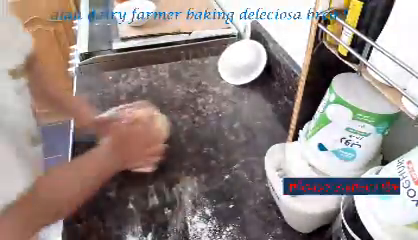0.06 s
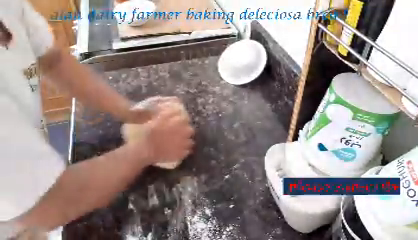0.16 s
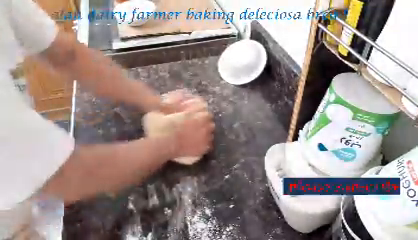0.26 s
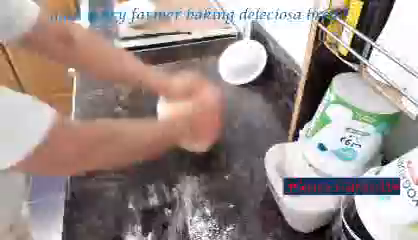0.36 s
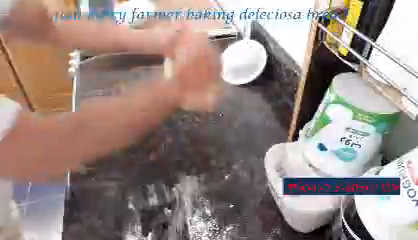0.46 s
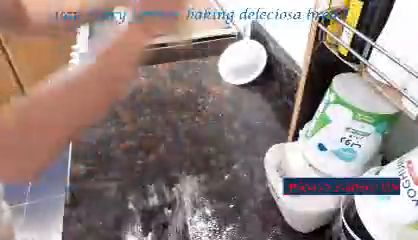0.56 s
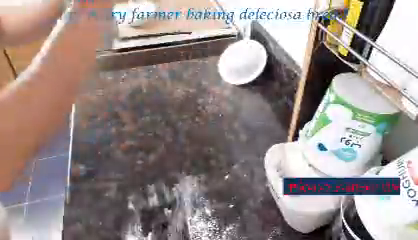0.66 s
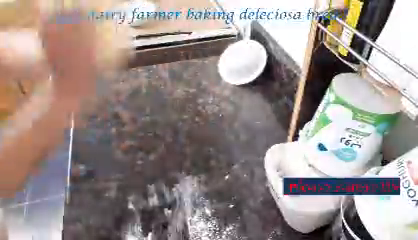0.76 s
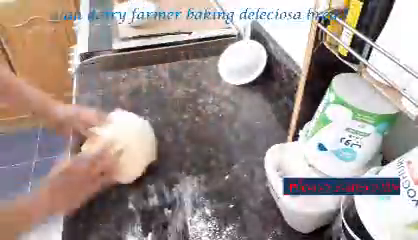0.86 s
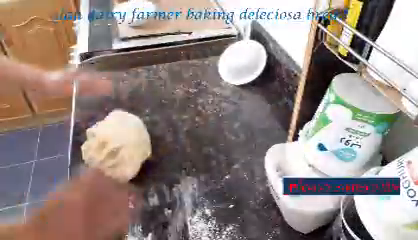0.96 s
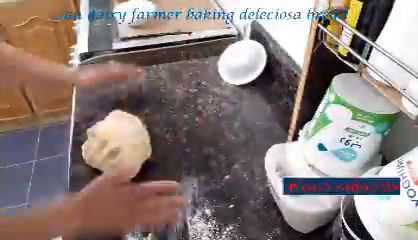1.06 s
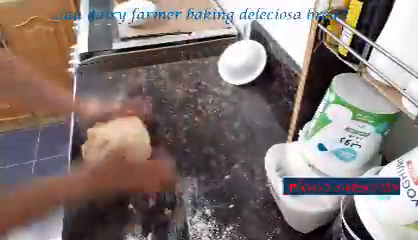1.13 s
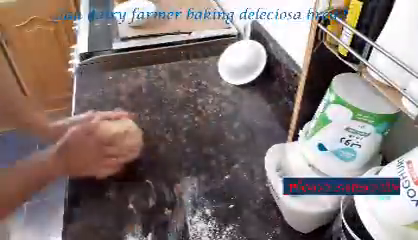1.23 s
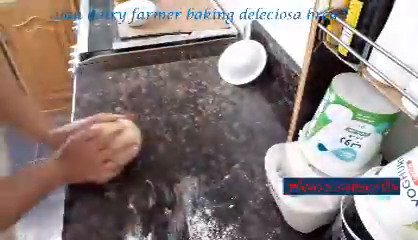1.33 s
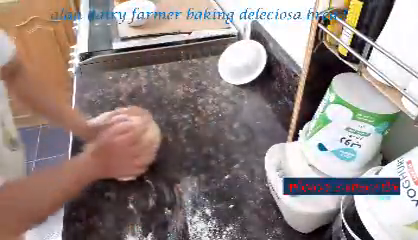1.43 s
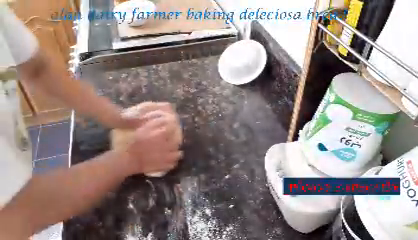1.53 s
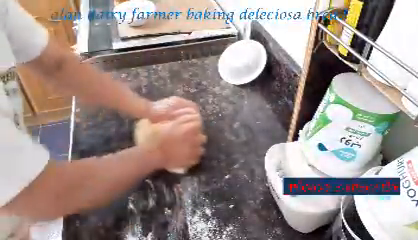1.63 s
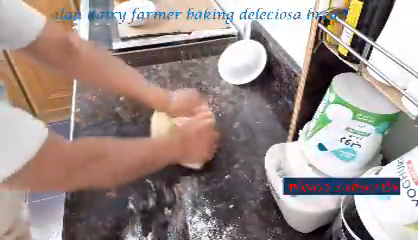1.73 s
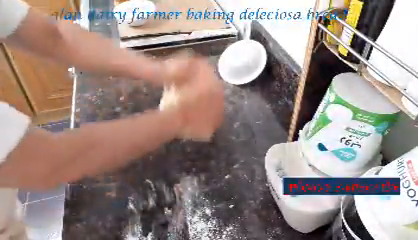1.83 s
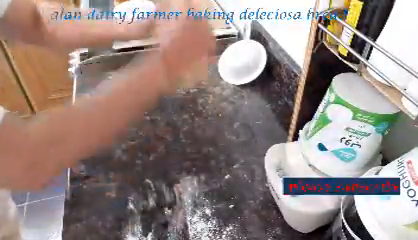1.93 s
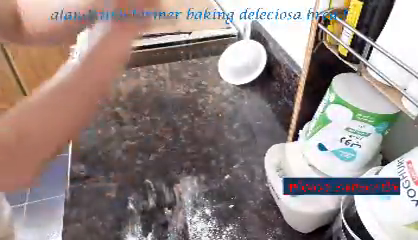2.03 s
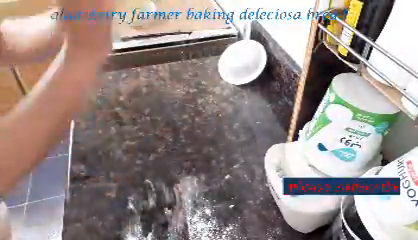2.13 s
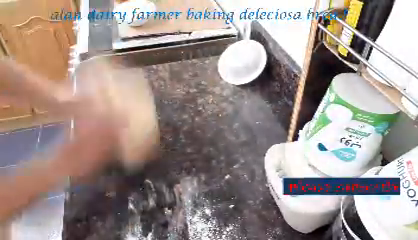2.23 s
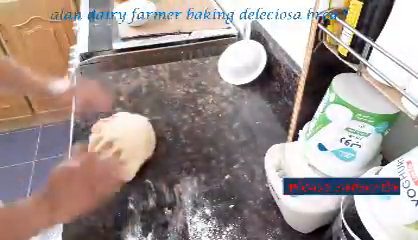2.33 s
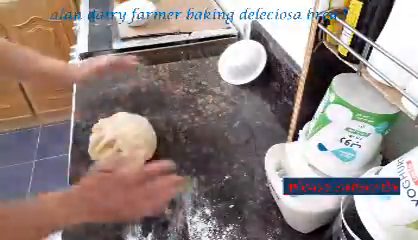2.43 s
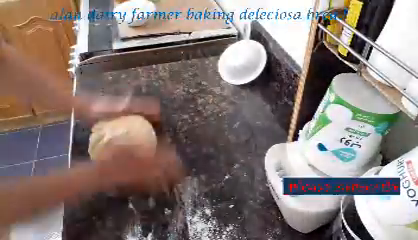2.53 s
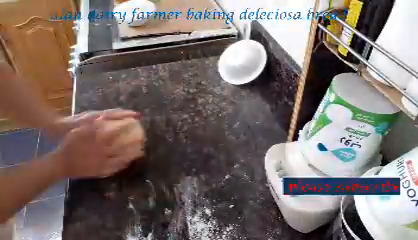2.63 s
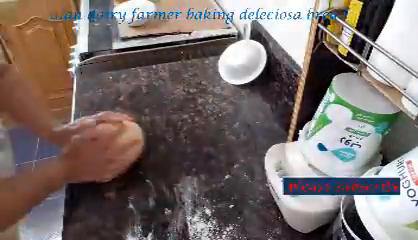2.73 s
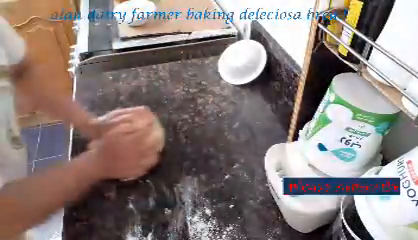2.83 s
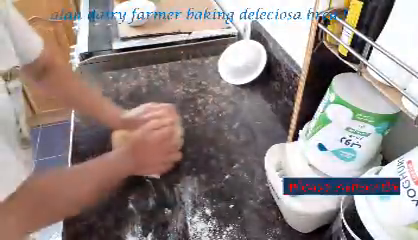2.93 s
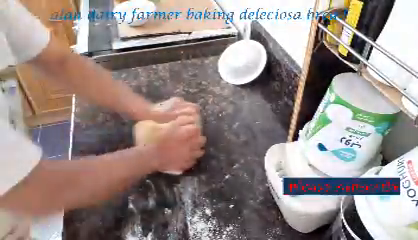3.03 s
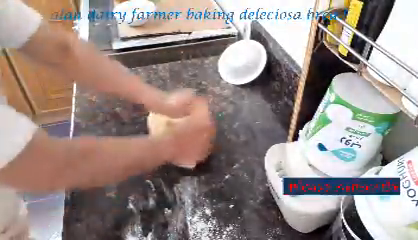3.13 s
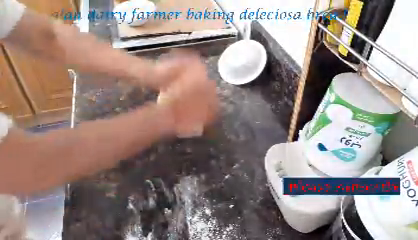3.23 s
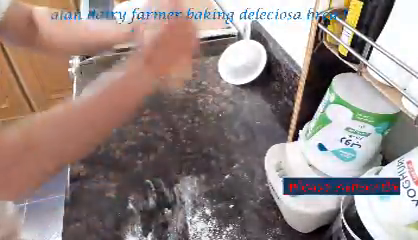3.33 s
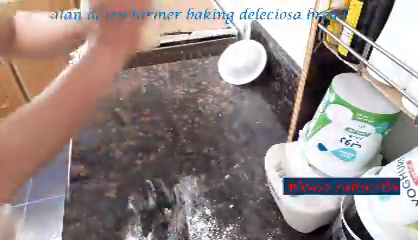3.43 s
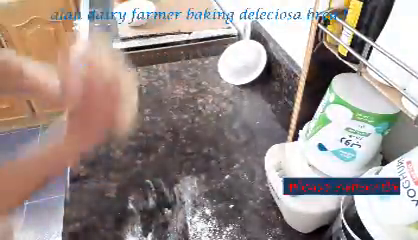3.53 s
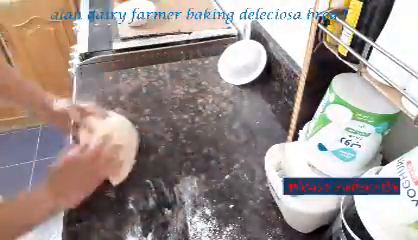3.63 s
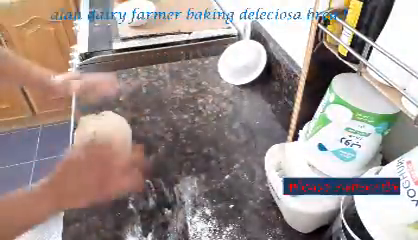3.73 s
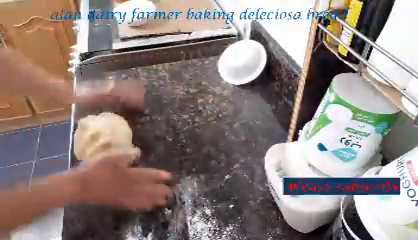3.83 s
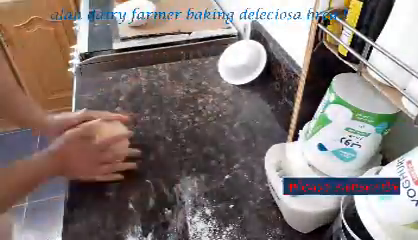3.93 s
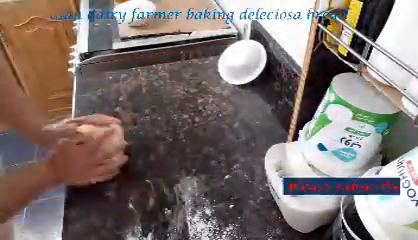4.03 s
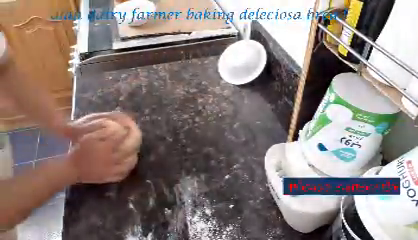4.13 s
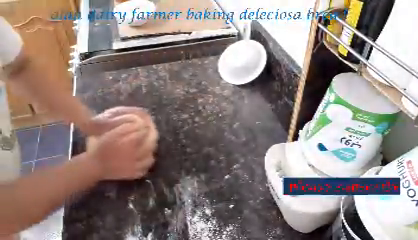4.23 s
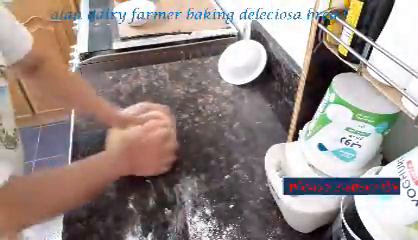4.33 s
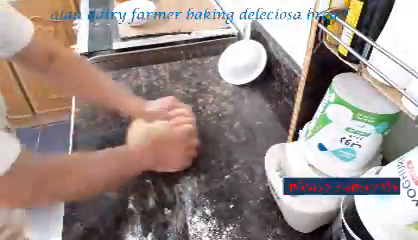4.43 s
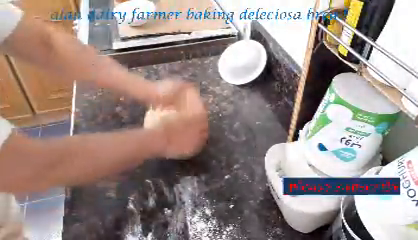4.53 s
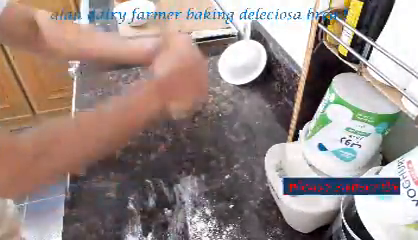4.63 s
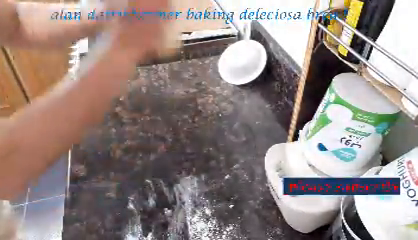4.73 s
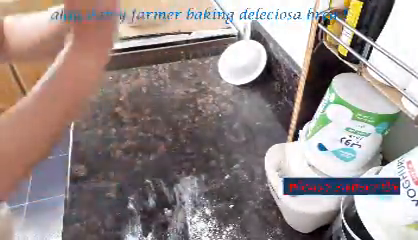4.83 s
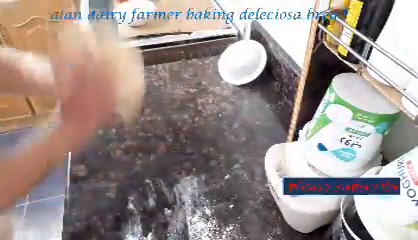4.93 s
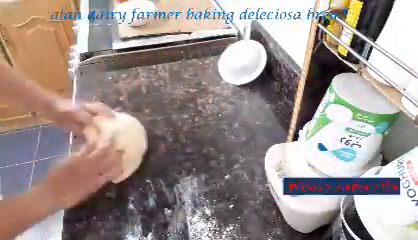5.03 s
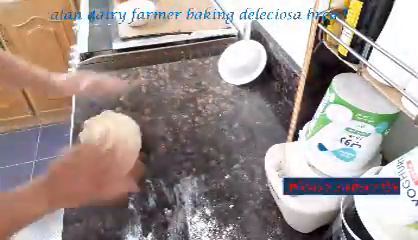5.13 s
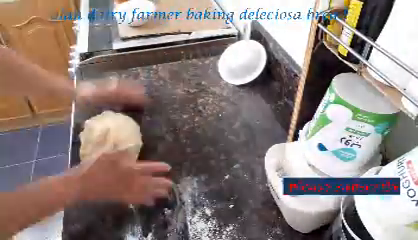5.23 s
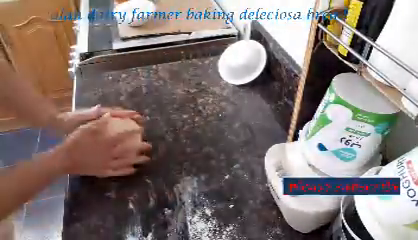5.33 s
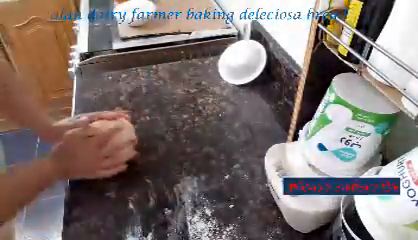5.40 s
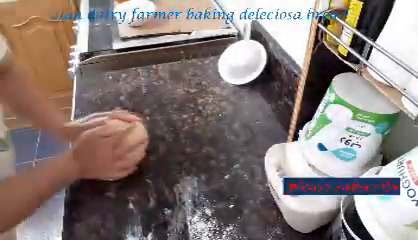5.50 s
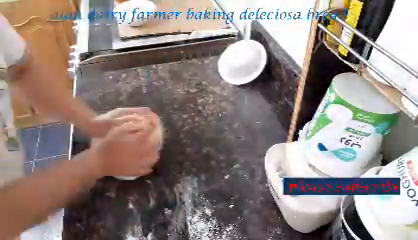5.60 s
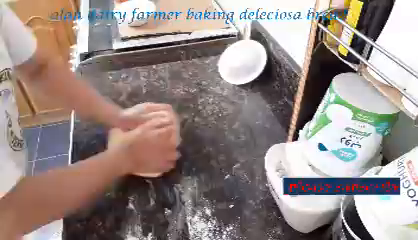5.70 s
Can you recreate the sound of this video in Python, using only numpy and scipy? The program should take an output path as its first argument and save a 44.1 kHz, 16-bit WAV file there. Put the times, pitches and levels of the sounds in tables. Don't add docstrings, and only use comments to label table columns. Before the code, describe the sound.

A small, hard-walled kitchen heard through a close stereo microphone, with a very quiet fridge drone, mains hum and soft hiss. At first hands rub dough over floury stone with faint dry scrapes, low counter rumble and tiny squeaks; around 0.3 s the dough peels away stickily. At 0.86 s it lands with a loud, wet, flat smack and a deep wooden cabinet boom, dying in short bright tile reflections. A much quieter bounce and roll follow at about 1.1 s, then scraping and another soft peel near 1.75 s. The second slap comes at 2.26 s, with a bounce near 2.5 s and small squeaks and chirps around 2.8 to 3 s. The third, at 3.62 s, has the sharpest crack, with a soft double bounce near 3.9 s. More dragging leads to a softer, duller fourth slap at 5.03 s, a faint bounce at 5.3 s, and final light scraping.

```python
import sys
import numpy as np
from scipy import signal
from scipy.fft import rfft, irfft
from scipy.io import wavfile

SR = 44100
rng = np.random.default_rng(int(sys.argv[2]) if len(sys.argv) > 2 else 0)


def to_wav(s):
    ch = np.atleast_2d(s).T
    pcm = np.round(np.clip(ch, -1, 1) * 32767)
    wavfile.write(sys.argv[1], SR, pcm.astype(np.int16))


def amplitude_ratio(level_db):
    exponent = np.asarray(level_db, float) / 20
    return 10 ** exponent


N = 254016
BLOW_PAN_DB, HAND_PAN_DB = -4, -5.5

# start_s, level_db
GRAZES = [
    (0.8541, -31),
    (2.256, -33.5),
    (3.6115, -45.5),
    (5.0247, -46.5),
]
# start_s, boom_db, door_db, shelf_db, room_db
THROWS = [
    (.8630, -19.5, -7, 0.5, -3.5),
    (2.2640, -21, 2.5, -23.5, -2.5),
    (3.6233, -19, -7, -3, -1.5),
    (5.0343, -21.5, -13.5, -7.5, -1.5),
    (1.095, -45.5, -7, -15.5, -2),
    (2.516, -42.5, -5, -8, 2.5),
    (3.877, -46.5, -6, -9, -2),
    (5.275, -50.5, -0.5, -8, 0),
]


def at_hz(points, hz):
    table_hz, value = np.array(points).T[:2]
    return np.interp(np.log(hz), np.log(table_hz), value)


def rms_one(x):
    return x / np.sqrt(np.mean(x ** 2) + 1e-20)


def stereo_noise(gain, size=N):
    # pitch_hz, likeness (0 to 1)
    coherence = [(60, 0.971), (200, 0.893), (500, 0.46), (1500, 0.03), (12000, 0.039)]
    hz = np.maximum(np.arange(size // 2 + 1) * SR / size, 10)
    alike = np.clip(at_hz(coherence, hz), 0, 1)
    mid, side = rfft(rng.standard_normal((2, size))) * gain(hz)
    return irfft(np.sqrt(1 + alike) * mid + np.sqrt(1 - alike) * side * [[1], [-1]], size)


def coloured_noise(spectrum):
    return rms_one(stereo_noise(lambda hz: amplitude_ratio(at_hz(spectrum, hz))))


def resonance(x, hz, width_hz):
    r = np.exp(-np.pi * width_hz / SR)
    feedback = [1, -2 * r * np.cos(2 * np.pi * hz / SR), r * r]
    return signal.lfilter([(1 - r * r) / 2, 0, (r * r - 1) / 2], feedback, x)


def double_resonance(x, hz, width_hz):
    return resonance(resonance(x, hz, width_hz), hz, width_hz)


def band(x, low_hz, high_hz):
    edges_hz = [low_hz, min(high_hz, .45 * SR)]
    return signal.sosfilt(signal.butter(2, edges_hz, "band", fs=SR, output="sos"), x)


def swells(rows, rise_s, fall_s, rest_db):
    t = np.arange(N) / SR
    s, length_s, db = np.array(rows).T[:, :, None]
    rising = (t - s) / rise_s + 1
    falling = (s + length_s - t) / fall_s + 1
    ramp = np.clip(np.minimum(rising, falling), 0, 1)
    return amplitude_ratio(rest_db) + np.max(amplitude_ratio(db) * np.sin(np.pi / 2 * ramp) ** 2, axis=0)


def fridge():
    # time_s, level_db
    loudness = [(0, -75), (.24, -79), (.6, -73.5), (.8, -77), (1.3, -74), (1.6, -80), (1.95, -72.5),
                (2.2, -74), (2.8, -76), (2.92, -73), (3.4, -73.5), (4.1, -71.5), (4.4, -71), (4.65, -70.5),
                (4.9, -70.5), (5.4, -72.5), (5.76, -70.5)]
    # pitch_hz, level_db (per Hz)
    drone = [(120, -38), (200, -13), (232, -4.5), (291, -0.5), (318, -5), (413, 0), (523, -7), (620, -7.5),
             (730, -19.5), (1040, -18.5), (1400, -27.5), (1820, -58), (3080, -120)]
    swell = amplitude_ratio(np.interp(np.arange(N) / SR, *np.transpose(loudness)))
    return amplitude_ratio(4.5) * swell * coloured_noise(drone) * amplitude_ratio([[-1.5], [1.5]])


def microphone_noise():
    # pitch_hz, level_db (per Hz)
    hiss = [(700, -4.5), (1000, -8), (1350, -12), (1800, -6.5), (2300, -17), (3300, -15), (4000, -21),
            (4600, -20), (7000, -21), (8000, -9.5), (9100, -8.5), (9800, -23), (11500, -15), (13500, -20.5)]
    return amplitude_ratio(-75 + 1.5) * coloured_noise(hiss) * amplitude_ratio([[-1.5], [1.5]])


def electric_tones():
    # pitch_hz, level_db
    tones = [(100, -84), (11000, -90)]
    t = np.arange(N) / SR
    return sum(amplitude_ratio(db) * np.sqrt(2) * np.sin(2 * np.pi * hz * t) for hz, db in tones)


def rumble():
    # start_s, level_db
    bumps = [(0.0, -62), (.22, -67.5), (.41, -80.5), (.74, -77.5), (1.2, -64.5), (1.43, -70), (1.76, -73.5),
             (2.05, -77), (2.48, -56), (2.7, -72), (3.15, -65.5), (3.33, -72.5), (3.95, -62), (4.3, -73),
             (4.52, -65), (4.8, -68.5), (5.38, -62), (5.6, -67)]
    # pitch_hz, level_db (per Hz)
    low_spectrum = [(15, -57), (25, -14.5), (40, -17.5), (86, 1.5), (119, -6.5), (146, 0), (160, -9),
                    (173, -15.5), (200, -13), (260, -42.5), (440, -120)]
    rise_s, t60_s, rest_db = 0.034, 0.74, -79
    s, db = np.array(bumps).T[:, :, None]
    since = np.maximum(np.arange(N) / SR - s + rise_s, 0)
    shaken = amplitude_ratio(db - 60 * since / t60_s) * np.minimum(since / rise_s, 1)
    gain = amplitude_ratio(rest_db) + np.max(shaken, axis=0)
    return amplitude_ratio(2.5) * gain * coloured_noise(low_spectrum)


def dragging():
    # start_s, length_s, level_db
    strokes = [(0.05, 0.031, -68.5), (.15, .1, -75), (.31, 0.0685, -67.5), (.62, 0.0405, -74.5),
               (1.1, 0.104, -69.5), (1.4, 0.028, -71.5), (1.5, 0.19, -71.5), (1.75, 0.027, -67),
               (1.98, 0.042, -80.5), (2.5, 0.134, -71.5), (2.8, .29, -66.5), (3.12, 0.036, -65),
               (3.88, 0.082, -64.5), (4.11, 0.0735, -69), (4.22, .1, -71.5), (4.4, 0.177, -65),
               (4.77, .03, -77), (5.28, 0.103, -66.5), (5.65, .11, -67.5)]
    # pitch_hz, level_db (per Hz)
    friction = [(700, -8), (1800, -12.5), (2200, -10), (3900, -12.5), (4600, -8.5), (7400, -3), (8100, -1),
                (9100, -1), (9800, -11.5), (11600, -2.5), (13500, -4)]
    grip = swells(strokes, rise_s=0.093, fall_s=0.1162, rest_db=-85)
    return grip * coloured_noise(friction) * amplitude_ratio([[-.5], [3.5]])


def duct_air():
    # start_s, length_s, level_db
    gusts = [(.05, 0.043, -78.5), (.33, 0.039, -80), (.5, 0.19, -76.5), (1.2, 0.232, -81),
             (1.77, 0.051, -81.5), (2.0, 0.063, -79.5), (2.6, 0.053, -78.5), (2.81, 0.082, -73.5),
             (2.95, 0.081, -78), (3.15, .03, -82), (3.95, 0.0488, -69.5), (4.12, 0.046, -81.5),
             (4.47, 0.11, -78), (4.74, 0.048, -74), (4.88, .05, -80.5), (5.35, 0.031, -75)]
    # pitch_hz, width_hz, level_db
    duct_modes = [(1521, 150, -2), (1788.7, 210, 0.5)]
    flow = swells(gusts, rise_s=0.077, fall_s=0.1016, rest_db=-91.5)
    white = stereo_noise(np.ones_like)
    air = sum(amplitude_ratio(db) * rms_one(double_resonance(white, hz, width)) for hz, width, db in duct_modes)
    return flow * rms_one(air) * amplitude_ratio([[-.5], [3.5]])


def squeaks():
    # start_s, length_s, pitch_hz, width_hz, level_db
    slips = [
        (0.039, 0.11, 4440, 250, -76.5),
        (0.295, 0.52, 3302, 250, -85),
        (0.439, 0.366, 4610, 250, -84),
        (2.784, 0.176, 4360, 200, -77.5),
        (2.791, 0.048, 11520, 700, -70),
        (2.95, 0.068, 11780, 495.5, -69),
    ]
    out, size = np.zeros((2, N)), SR // 2
    t = np.arange(size) / SR
    for s, length_s, hz, width_hz, db in slips:
        squeal = double_resonance(rng.standard_normal((2, size)), hz, width_hz)
        swell = np.sin(np.pi * np.clip(t / length_s, 0, 1)) ** .5
        i = round(s * SR)
        out[:, i:i + size] += amplitude_ratio(db) * swell * rms_one(squeal)
    return out * amplitude_ratio([[-2], [2]])


def colours(x, pocket_hz, thwack_db, pocket_db, spray_db, crack_db):
    thwack = 5.015 * band(x, 260, 1600)
    pocket = 6.99 * resonance(x, pocket_hz, 950)
    spray = 4.6 * band(x, 2100, 8500)
    crack = 3.8 * resonance(x, 8600, 1800) + 1.8 * band(x, 9800, 15000)
    return amplitude_ratio([thwack_db, pocket_db, spray_db, crack_db]) @ np.stack([thwack, pocket, spray, crack], axis=1)


def contacts(rows, rise_s, t60, snap, lag_s, pan_db, size):
    # start_s, pitch_hz
    pockets = [
        (0, 1660),
        (2.2, 1940),
        (2.5, 1842),
        (3.5, 1650),
        (3.85, 1930),
        (5.0, 1391),
    ]
    out, t = np.zeros((3, N)), np.arange(size) / SR
    shape = (1 - np.exp(-t / rise_s)) * amplitude_ratio(-60 * t / t60)
    for s, *levels_db in rows:
        common = rng.standard_normal(size)
        rush = shape * (common + 0.79 * rng.standard_normal((3, size)))
        rush[:, 4:7] -= snap * np.hanning(5)[1:4]
        rush[0] = np.roll(rush[0], 3)
        rush[2] = (t == 0) * np.sqrt(np.sum(shape ** 2) + snap ** 2)
        pocket_hz = [hz for start, hz in pockets if start <= s][-1]
        i = round((s + lag_s) * SR)
        pan = amplitude_ratio([[pan_db / 2], [-pan_db / 2], [0]])
        out[:, i:i + size] += colours(rush, pocket_hz, *levels_db) * pan
    return out


def tinted(rows, colour_db):
    return [(s, *(db + np.array(colour_db))) for s, db in rows]


def lifts():
    # start_s, level_db
    peels = [
        (.33, -72),
        (1.745, -70.5),
        (3.125, -73),
        (4.52, -69.5),
    ]
    # thwack_db, pocket_db, spray_db, crack_db
    tint_db = (-1, -2, 1, -2.5)
    return contacts(tinted(peels, tint_db), rise_s=0.0093, t60=0.16, snap=0, lag_s=0,
                    pan_db=HAND_PAN_DB, size=8192)


def swish():
    # thwack_db, pocket_db, spray_db, crack_db
    tint_db = (-18.5, -16.5, -14.5, 3)
    lead_s, level_db = .066, -61
    falls = [(s - lead_s, level_db) for s, db in GRAZES]
    return contacts(tinted(falls, tint_db), rise_s=0.11, t60=0.71, snap=0, lag_s=0,
                    pan_db=HAND_PAN_DB, size=3000)[:2]


def grazes():
    # thwack_db, pocket_db, spray_db, crack_db
    tint_db = (2, -1.5, -1.5, -1)
    return contacts(tinted(GRAZES, tint_db), rise_s=.003, t60=0.1, snap=0, lag_s=0,
                    pan_db=BLOW_PAN_DB, size=4096)


def blows():
    # start_s, thwack_db, pocket_db, spray_db, crack_db
    impacts = [(0.858, -21.5, -28.5, -32.5, -35), (0.861, -13.5, -23, -28.5, -26.5),
               (0.865, -22.5, -13.5, -29.5, -34.5), (0.873, -23, -25, -33.5, -29),
               (2.261, -13, -23, -32, -32), (2.266, -16.5, -18, -28.5, -35),
               (2.268, -18.5, -28.5, -36, -28), (2.275, -33, -18, -37, -34.5),
               (3.615, -12, -21, -23, -12.5), (3.622, -19, -29, -21, -27.5),
               (5.027, -27, -22.5, -32.5, -22), (5.031, -30, -34, -25, -30.5)]
    return contacts(impacts, rise_s=0.0004, t60=0.01363, snap=1.5, lag_s=.001,
                    pan_db=BLOW_PAN_DB, size=2048)


def cabinet(push_s):
    # pitch_hz, level_db, t60_s
    carcass = [(96.32, -10.5, 0.59), (112, -12, 0.39), (113.62, -2.5, 0.4), (129.76, -0.5, .3),
               (142.9, -0.5, 0.19), (199, -15.5, 0.087), (225.9, -16.5, 0.57)]
    floor = [(49, -7.5, 0.63), (75.7, -11, 0.45)]
    door = [(292.7, 4, 0.13), (296, -5, 0.16), (321.76, -3, 0.25)]
    shelf = [(380.3, -1.5, 0.17), (439, -6, 0.33), (474.1, -6, 0.36), (555, -12, 0.078)]
    floor_db = -7
    out, t = np.zeros(N + SR), np.arange(SR * 3 // 4) / SR
    rings = [sum(amplitude_ratio(db - 60 * t / t60) * np.sin(2 * np.pi * hz * t) for hz, db, t60 in modes)
             for modes in (carcass, floor, door, shelf)]
    rings[2] = np.roll(rings[2], round(.0065 * SR))
    for s, boom_db, door_db, shelf_db, room_db in THROWS:
        i = round(s * SR)
        ring = amplitude_ratio([0, floor_db, door_db, shelf_db]) @ rings
        out[i:i + len(t)] -= amplitude_ratio(boom_db) * ring
    push = np.hanning(max(round(push_s * SR), 3))
    return signal.fftconvolve(out, push / push.sum())[:N]


def landings():
    # start_s, thwack_db, pocket_db, spray_db, crack_db
    returns = [
        (1.134, -52.5, -50, -54, -53),
        (1.162, -54, -53, -67.5, -59.5),
        (2.536, -46, -46, -55.5, -48),
        (2.579, -61.5, -66.5, -73.5, -60.5),
        (3.134, -62, -62, -66.5, -56.5),
        (3.893, -44, -48, -51.5, -57.5),
        (3.916, -41.5, -43, -46, -52),
        (5.296, -62, -55.5, -60, -54.5),
        (5.329, -61.5, -54, -59.5, -52.5),
    ]
    return amplitude_ratio(-5) * contacts(returns, rise_s=0.00065, t60=0.04363, snap=1.37, lag_s=0.001,
                              pan_db=HAND_PAN_DB, size=4096)


def kitchen(x, gap_s, build_s):
    # pitch_hz, t60_s
    decay = [(150, 0.44), (500, 0.4704), (1500, 0.4885), (4000, 0.4734), (8000, 0.3593), (12000, 0.28)]
    # pitch_hz, level_db
    tile_colour = [(150, -1.5), (400, -0.5), (800, -2.5), (1500, -0.5), (2500, 1), (4000, -2), (6000, 2),
                   (9000, -2), (12000, 1.5)]
    t = np.arange(SR * 3 // 4) / SR
    edges_hz = 100 * 2 ** np.arange(0, 7.3, .5)
    white = [stereo_noise(np.ones_like, size=len(t)) for k in range(2)]
    echo = 0
    for k, (low, high) in enumerate(zip(edges_hz, edges_hz[1:])):
        hz = np.sqrt(low * high)
        fade = amplitude_ratio(at_hz(tile_colour, hz) - 60 * t / at_hz(decay, hz))
        echo = echo + band(white[k % 2], low, high) * fade
    echo = echo * (1 - np.exp(-np.maximum(t - gap_s, 0) / build_s))
    return signal.fftconvolve(x[None], echo, axes=1)[:, :N]


def room_send():
    s, room_db = np.array(sorted(THROWS))[:, [0, -1]].T
    latest = np.searchsorted(s, np.arange(N) / SR + .03) - 1
    return amplitude_ratio(room_db[np.maximum(latest, 0)])


def scene():
    background = fridge() + microphone_noise() + electric_tones() + rumble() + dragging() + duct_air()
    dough = lifts() + grazes() + blows() + landings()
    boom = cabinet(push_s=0.002661)
    wet = kitchen(room_send() * (dough[2] + amplitude_ratio(-11.5) * boom), gap_s=0.0016, build_s=.006)
    direct = dough[:2] + swish() + boom * amplitude_ratio([[-.2], [.2]])
    return direct + amplitude_ratio(-29.5) * wet * amplitude_ratio([[-1.6], [1.6]]) + background + squeaks()


def top_cut(x):
    return signal.sosfilt(signal.butter(12, 13670, fs=SR, output="sos"), x)


def record(dry):
    mix = signal.sosfilt(signal.butter(6, 50, "high", fs=SR, output="sos"), dry)
    mix = signal.sosfilt(signal.ellip(8, .5, 42, 12450, fs=SR, output="sos"), mix)
    return top_cut(mix)


dry = scene()
out = record(dry)
to_wav(out)
```